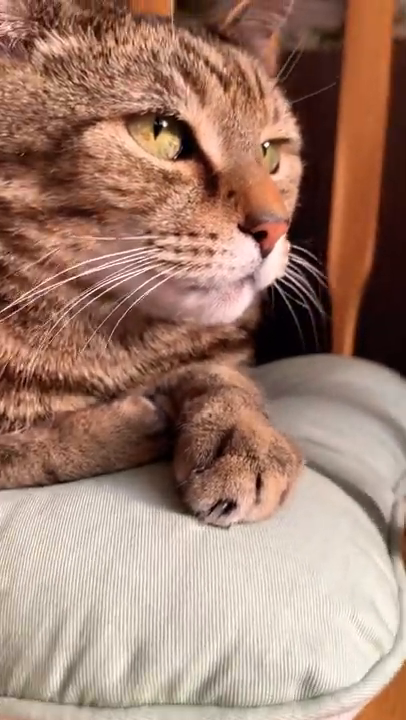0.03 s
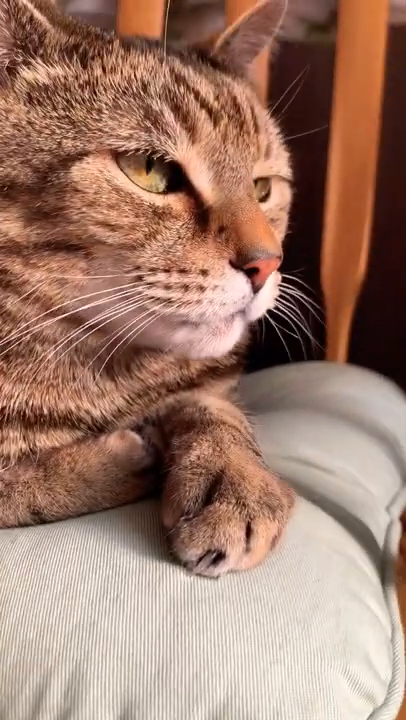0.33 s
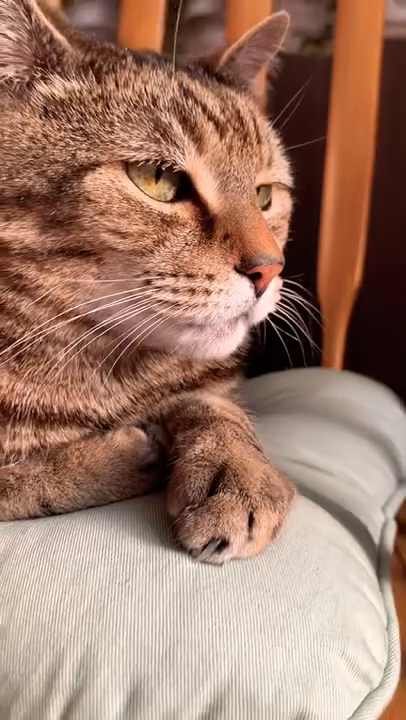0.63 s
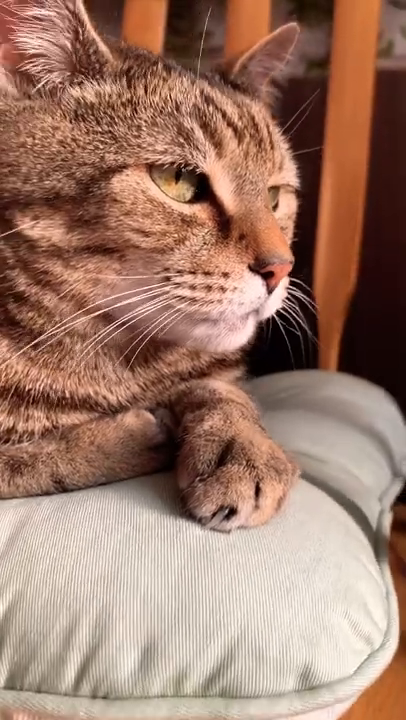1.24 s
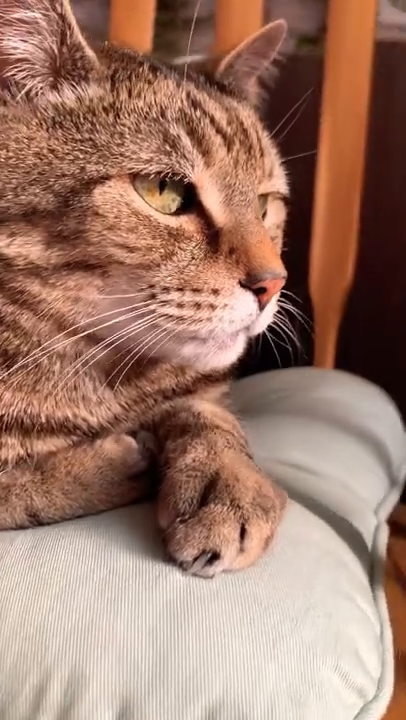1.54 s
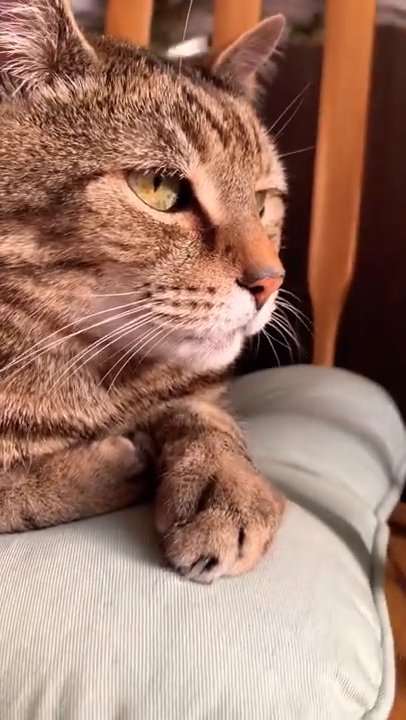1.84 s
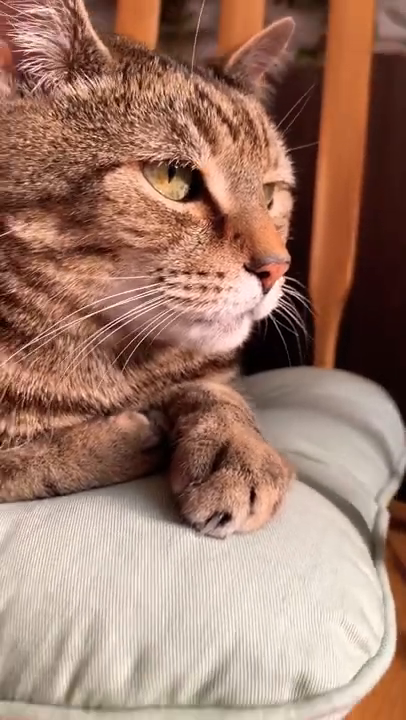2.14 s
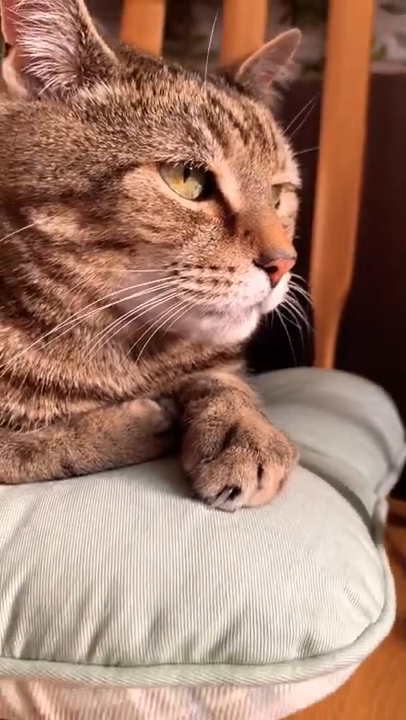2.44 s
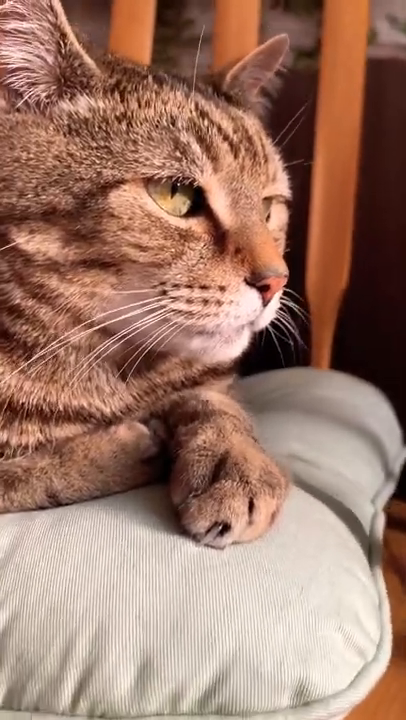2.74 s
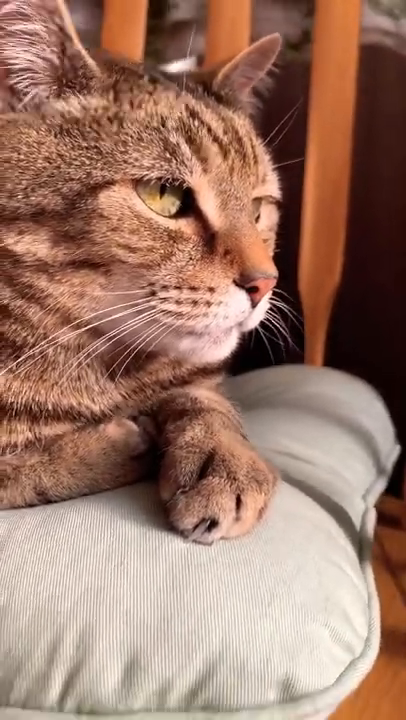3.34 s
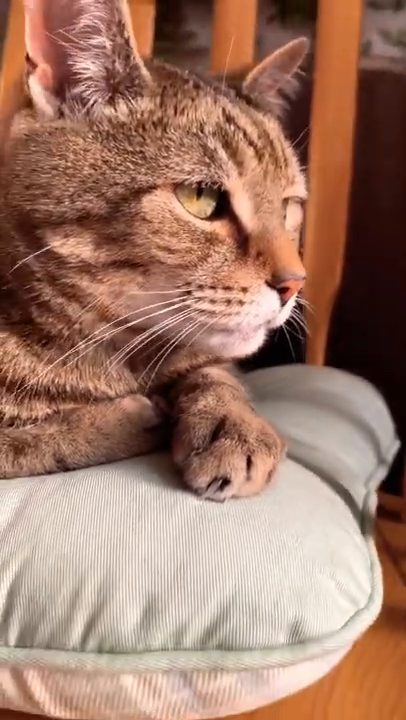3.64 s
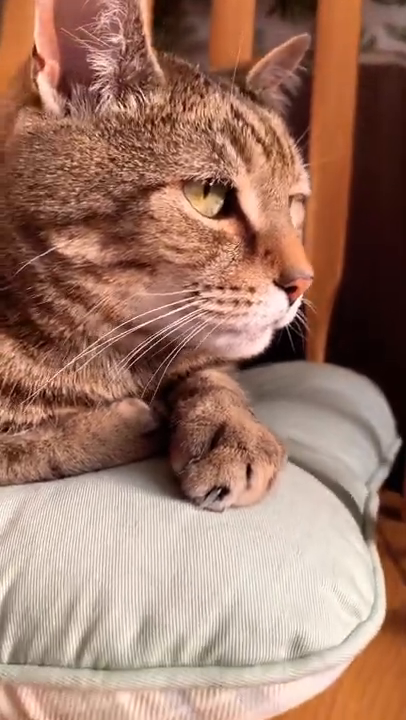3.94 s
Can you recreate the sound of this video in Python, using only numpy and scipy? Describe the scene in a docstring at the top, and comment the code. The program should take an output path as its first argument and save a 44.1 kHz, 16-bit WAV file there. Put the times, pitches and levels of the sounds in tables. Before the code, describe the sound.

Quiet indoor room tone in stereo: a low rumble with gently swelling deep tones and a light hiss. Very faint rustles come and go, and near the middle comes one faint tick, perhaps from a wooden chair.

```python
"""A quiet room where a cat rests on a chair, heard by two closely spaced microphones.
From the start there is a steady rumble, coloured by narrow resonances, with an airy wash and a thin
hiss on top. A low boom and a deeper one swell and ebb, and very faint rustles soon come and go.
About halfway through, something small ticks faintly, perhaps the wooden chair.
Near the end the wash and the rumble sink a little, while the booms keep swelling."""
import sys
import numpy as np
from scipy import signal
from scipy.fft import rfft, irfft
from scipy.io import wavfile

SR = 44100
rng = np.random.default_rng(int(sys.argv[2]) if len(sys.argv) > 2 else 0)


def waveform_to_disk(signal):
    """Save audio, clipped to [-1, 1], as 16-bit WAV at the path in sys.argv[1]."""
    frames = np.transpose(np.atleast_2d(signal))
    scaled = np.clip(frames, -1, 1) * 32767
    samples = np.round(scaled).astype(np.int16)
    wavfile.write(sys.argv[1], SR, samples)


N = 176400
TIME = np.arange(N) / SR
FREQS = np.fft.rfftfreq(N, 1 / SR)

# How the two microphones differ. Each row: frequency in Hz, how alike they sound from 0 to 1,
# how far the left is ahead in radians, how much louder the left is in dB.
MIC_PAIR = [(60.4, 1, 0.28, -0.5), (89.3, 1, 0.14, -0.2), (131.4, 1, -0.37, 0.5), (257, 0.96, -0.22, 0),
            (360, 0.98, 1.01, -4.5), (460, 0.9, 0.19, -3.5), (510, 0.7, 0, -3), (642, .45, 2, -3),
            (923, .68, 1.58, -0.5), (1070, .75, 2.5, -1), (1330, 0.6, 1.66, 0), (1800, 0.74, 2, 0),
            (2410, 0.83, 3.5, 0), (3750, 0.69, 2, 0), (4180, 0.57, 2, 0), (5140, 0.82, 3, 0.5),
            (6500, .7, 5, 0.5), (7460, 1, 5.5, 0.5), (9070, 0.98, 6.5, -1.5), (10380, 1, 8, 0),
            (11070, 1, 8.5, 1), (13660, 1, 10.5, 0)]


def room_tone():
    """The room's steady sound: rumble, wash and hiss, all coloured by the same resonances."""
    # Slow rise and fall of the wash. Each row: time in seconds, level change in dB.
    swells = [(0, 0), (.15, 1.2), (.6, -0.5), (1, 0.5), (1.4, 1), (1.6, -1), (1.8, 0.3), (2.4, 0.1),
              (2.8, 0), (3.3, -2.5), (3.5, -1), (4, -2.5)]
    swell_db = np.interp(TIME, *np.transpose(swells))
    colour_db = room_colour()
    return rumble(colour_db, swell_db) + wash(colour_db, swell_db) + hiss(colour_db)


def rumble(colour_db, swell_db):
    """Low noise that follows part of the wash's slow rise and fall."""
    # The rumble's tone. Each row: frequency in Hz, level in dB per Hz.
    spectrum = [(15, -102), (25, -93.5), (40, -81.5), (62, -83), (80, -73.5), (92, -81.5), (120, -76),
                (150, -81), (230, -82.5), (500, -81), (570, -88.5), (700, -96), (1200, -125), (3000, -160)]
    return amp(0.65 * swell_db) * pair_noise(curve(spectrum) + colour_db)


def wash(colour_db, swell_db):
    """Airy noise above the rumble that swells slowly and flutters gently."""
    # The wash's tone. Each row: frequency in Hz, level in dB per Hz.
    spectrum = [(200, -130), (500, -95.5), (700, -91.5), (1020, -91), (1120, -98), (1240, -93.5),
                (1350, -96.5), (1720, -100.5), (2000, -107), (2500, -118), (3500, -131), (6000, -140),
                (14000, -155)]
    flutter_db = 1.53 * drift(per_s=16)
    return amp(swell_db + flutter_db) * pair_noise(curve(spectrum) + colour_db)


def booms():
    """Two low resonances, one deeper than the other, swell and ebb separately."""
    # The upper boom's loudness. Each row: time in seconds, level in dB.
    upper_levels = [(0, -62), (.07, -47), (.25, -72), (.65, -58), (.82, -51), (1.13, -58), (1.22, -47),
                    (1.28, -58), (1.37, -45), (1.55, -74), (1.83, -63), (2, -43), (2.1, -59), (2.22, -60),
                    (2.3, -53), (2.62, -53.5), (2.75, -72), (3.14, -68), (3.22, -49.5), (3.35, -58),
                    (3.42, -48.5), (3.49, -56), (3.56, -47.5), (3.84, -61.5), (3.91, -43.5), (4, -45.5)]
    # The deeper boom's loudness. Each row: time in seconds, level in dB.
    deep_levels = [(0, -75), (.22, -57), (.5, -50.5), (.7, -60.5), (1.35, -66.5), (1.48, -53), (1.65, -66),
                   (1.8, -56), (2.04, -64), (2.2, -62), (2.7, -61.5), (3.15, -53.5), (3.45, -62),
                   (3.62, -55.5), (4, -56.5)]
    upper = low_tone(upper_levels, centre_hz=63.43, wander_hz=2.42, wander_per_s=3.96)
    deep = low_tone(deep_levels, centre_hz=46.24, wander_hz=5.26, wander_per_s=10)
    return upper + deep


def low_tone(levels, centre_hz, wander_hz, wander_per_s):
    """One boom: a tone with an unsteady pitch, alike in both ears."""
    hz = centre_hz + wander_hz * drift(wander_per_s)
    tone = unit(np.sin(2 * np.pi * np.cumsum(hz) / SR))
    return amp(np.interp(TIME, *np.transpose(levels))) * tone


def tick(start, level_db, rise_s, ring_db):
    """A brief scratch sets a few tones ringing and leaves a short tail in the room."""
    # The ringing tones. Each row: pitch in Hz, relative level in dB, seconds to fade by 60 dB.
    tones = [(1545, -1, 0.087), (2180, 6, 0.079), (2380, -9, 0.045), (2820, -8, 0.067), (4550, 4.5, 0.025),
             (4610, -5, 0.031), (5060, -4, .025)]
    # The dry scratch's tone. Each row: frequency in Hz, relative level in dB.
    scratch_spectrum = [(600, -11), (1700, 3.5), (2400, -2.5), (3200, -10), (3900, -17), (4800, -9.5),
                        (6000, -20.5), (8500, -17.5), (11000, -24), (14000, -37)]
    age = np.maximum(TIME - start, 0)
    left_lead = curve(MIC_PAIR, column=2)
    ring = 0
    for hz, db, fade_s in tones:
        lag = np.array([[0], [np.interp(hz, FREQS, left_lead)]])  # only the right side lags
        phase = 2 * np.pi * (hz * age + rng.random()) - lag
        ring = ring + amp(db) * fade(age, fade_s) * np.sin(phase)
    noise = unit(pair_noise(curve(scratch_spectrum)))
    scratch = amp(-3) * fade(age, fade_s=0.061) * noise
    room_tail = amp(-4.5) * fade(age, fade_s=0.22) * noise
    pan = amp(np.array([[5.5], [-5.5]]) / 2)  # favours the left by 5.5 dB
    rise = np.minimum(age / rise_s, 1)
    return amp(level_db) * pan * rise * (amp(ring_db) * ring + scratch + room_tail)


def rustle(middle, length, centre_hz, width_hz, level_db):
    """A soft band of noise that swells and fades."""
    band_db = -20 * np.log10(1 + ((FREQS - centre_hz) / width_hz) ** 4)
    return bell(TIME, middle, length) * pair_noise(level_db + band_db)


def hiss(colour_db):
    """Faint high noise with a thin whine in it."""
    # The hiss's tone. Each row: frequency in Hz, level in dB per Hz.
    spectrum = [(1000, -124), (2800, -121), (4300, -121.8), (5500, -124.3), (7000, -123.8), (8000, -123.5),
                (9200, -124), (10800, -126), (12000, -130), (14000, -130)]
    whine_db = 6.5 * bell(FREQS, centre=8785, width=75)
    return pair_noise(curve(spectrum) + colour_db + whine_db)


def room_colour():
    """The room's peaks and dips in dB: narrow resonances, plus small random ripples higher up."""
    # The resonances. Each row: frequency in Hz, width in Hz, boost in dB (negative makes a dip).
    resonances = [(80.4, 3.9, 4), (101.5, 5.9, 4.5), (149, 6, -4.5), (168.3, 12, 3.5), (200.7, 12, 5),
                  (228, 18, 7.5), (267.6, 12, 6.5), (290, 10, -6), (307, 6.9, 3), (328.6, 5.9, -4),
                  (348.3, 10, 6.5), (371, 17, 6), (389, 13, -7.5), (414.5, 9, 6), (443.5, 13, 5.5),
                  (444, 3.5, -5), (461.5, 4, -3.5), (474.8, 11, 8), (490.6, 7.7, 5), (503, 8, 4.5),
                  (600, 17, 4.5), (716, 21, 2.5), (753, 19, -5), (775, 12, 4.5), (847.6, 14, 6),
                  (927, 12, 5.5), (968, 32, 5), (1030, 12, 6), (1325, 60, 1), (1618, 24, 4), (1691, 43, 8)]
    spacing_hz, ripple_from_hz, flatten_hz = 9, 1050, 3970
    points = np.arange(0, SR / 2, spacing_hz)
    heights = np.interp(FREQS, points, rng.standard_normal(SR)[:len(points)])
    ripple_db = 1.6 * heights * (FREQS > ripple_from_hz) / (1 + (FREQS / flatten_hz) ** 2)
    return ripple_db + sum(db * bell(FREQS, hz, width) for hz, width, db in resonances)


def pair_noise(spectrum_db):
    """Noise with the given tone, as the two microphones pick it up."""
    noise_a, noise_b = rfft(rng.standard_normal((2, N)))
    likeness = np.clip(curve(MIC_PAIR, column=1), 0, 1)
    left_lead, pan_db = curve(MIC_PAIR, column=2), curve(MIC_PAIR, column=3)
    common = np.sqrt((1 + likeness) / 2) * noise_a
    apart = np.sqrt((1 - likeness) / 2) * noise_b
    left = (common + apart) * amp(pan_db / 2)
    right = (common - apart) * amp(-pan_db / 2) * np.exp(-1j * left_lead)
    return irfft(np.array([left, right]) * amp(spectrum_db) * np.sqrt(SR / 2), N)


def curve(table, column=1):
    """Joins a table's points to give one column's value at every frequency."""
    table = np.array(table)
    return np.interp(np.log(FREQS + 1), np.log(table[:, 0]), table[:, column])


def drift(per_s):
    """Random wandering with a typical size of 1, up to about per_s wobbles a second."""
    return unit(irfft(rfft(rng.standard_normal(N)) / (1 + (FREQS / per_s) ** 4), N))


def bell(x, centre, width):
    """A smooth hill of height 1."""
    return np.exp(-2 * ((x - centre) / width) ** 2)


def fade(age, fade_s):
    """Dies away by 60 dB in fade_s seconds."""
    return np.exp(-np.log(1000) * age / fade_s)


def amp(db):
    """Turns decibels into a volume multiplier."""
    return 10 ** (np.asarray(db) / 20)


def unit(x):
    """Scales a signal to a typical size (rms) of 1."""
    return x / np.sqrt(np.mean(x ** 2) + 1e-30)


def scene():
    """The room tone and its two booms, with the rustles and ticks on top."""
    # Very faint rustles and soft bumps. Each row: middle in seconds, length in seconds,
    # centre in Hz, width in Hz, peak level in dB per Hz.
    rustles = [(0.666, .08, 6150, 600, -120.5), (0.677, 0.17, 2320, 500, -111),
               (1.18, 0.15, 3800, 1000, -123), (1.262, 0.31, 2630, 380, -114),
               (2.097, 0.021, 1400, 370, -91), (2.353, 0.02, 1340, 230, -87.5),
               (2.43, 0.27, 2140, 300, -107), (3.426, 0.13, 79.6, 7, -66.5),
               (3.694, 0.093, 9200, 1600, -124)]
    # Faint ticks. Each row: start in seconds, level in dB, rise in seconds, ring strength in dB.
    ticks = [(1.453, -84, 0.002, -4), (1.969, -65, 0.013, -4), (1.9945, -66, 0.002, -0.5),
             (2.0005, -69, 0.0013, -1.5), (2.092, -73, 0.0055, -8)]
    room = room_tone() + booms()
    return room + sum(rustle(*row) for row in rustles) + sum(tick(*row) for row in ticks)


def record(dry):
    """The recorder steeply cuts off the highest treble."""
    low_pass = signal.firwin(511, cutoff=14450, window=("kaiser", 9), fs=SR)
    return signal.oaconvolve(dry, low_pass[None], "same")


dry = scene()
out = record(dry)
waveform_to_disk(out)
```